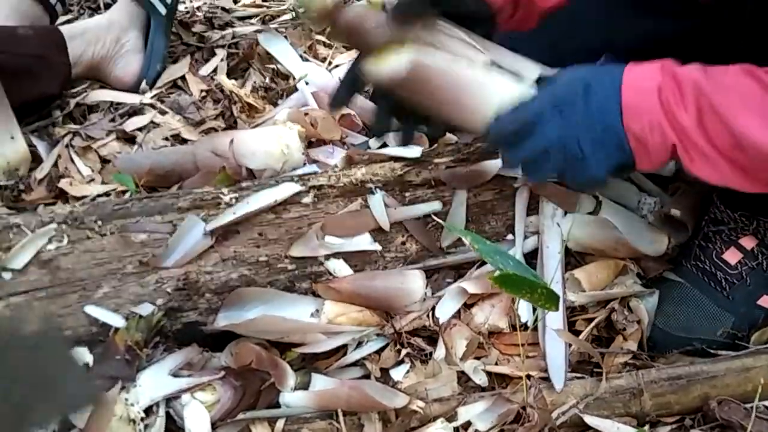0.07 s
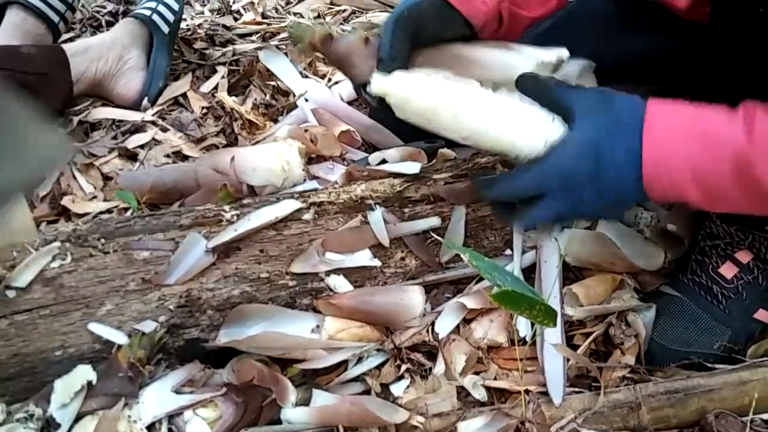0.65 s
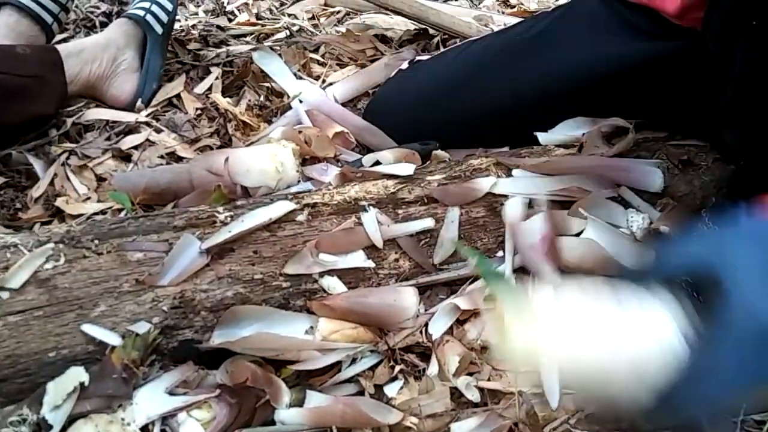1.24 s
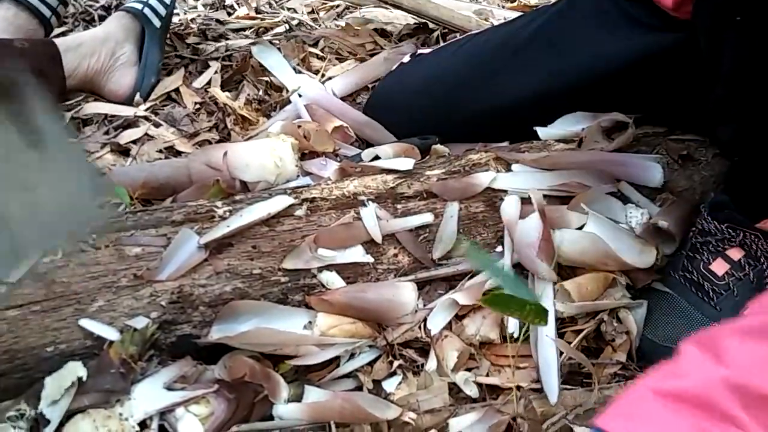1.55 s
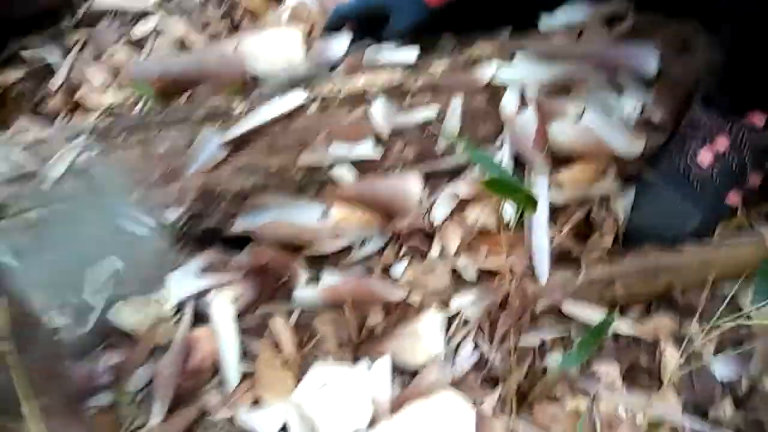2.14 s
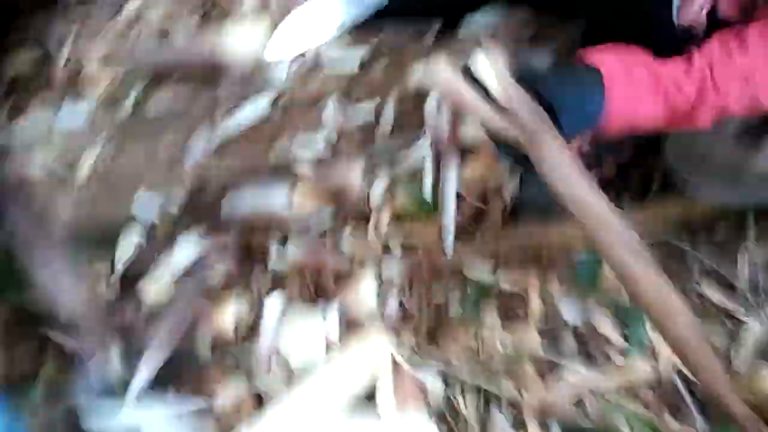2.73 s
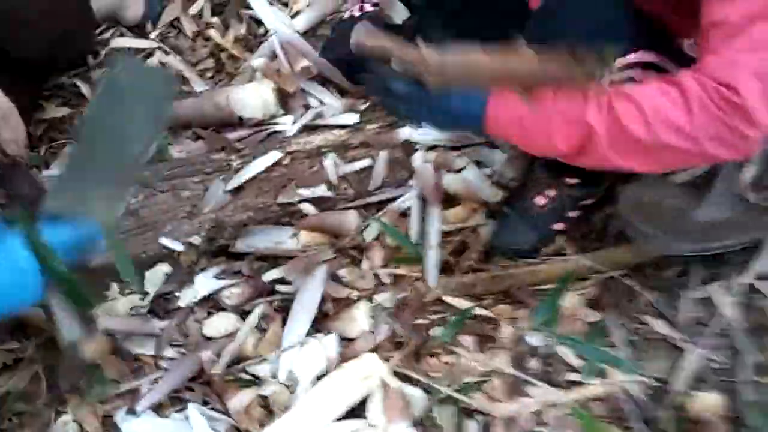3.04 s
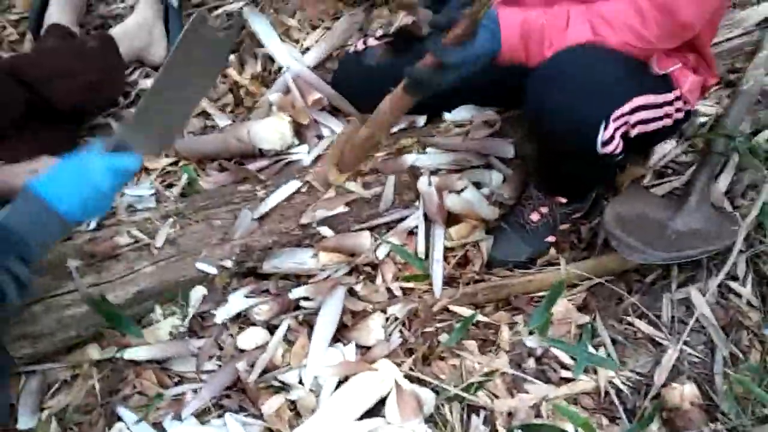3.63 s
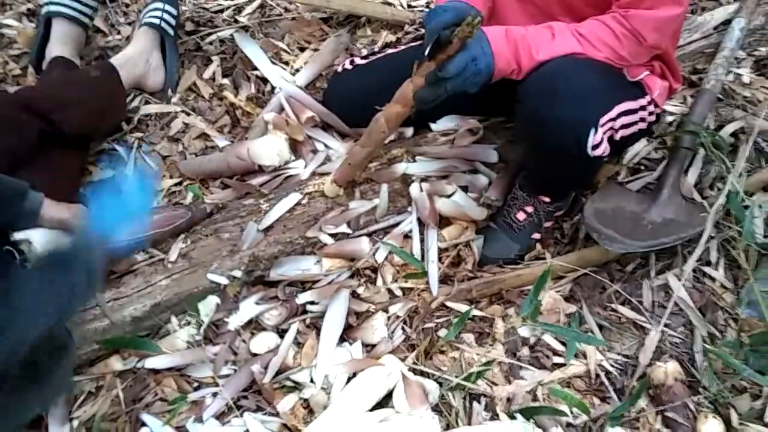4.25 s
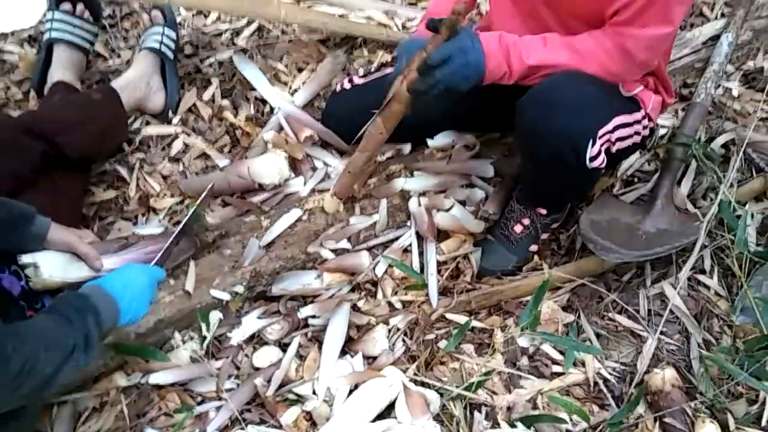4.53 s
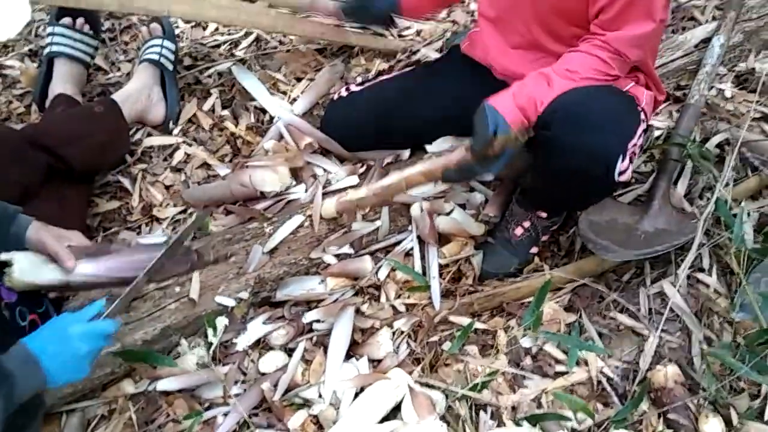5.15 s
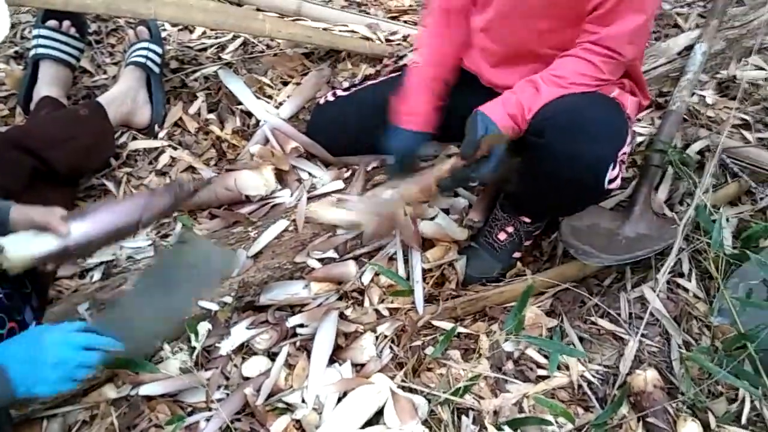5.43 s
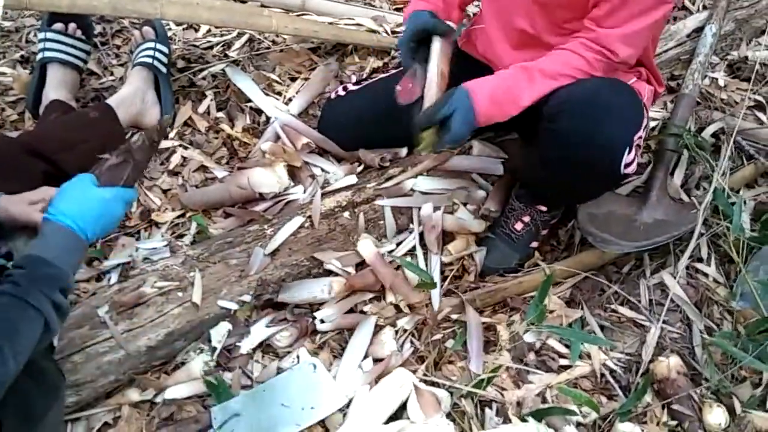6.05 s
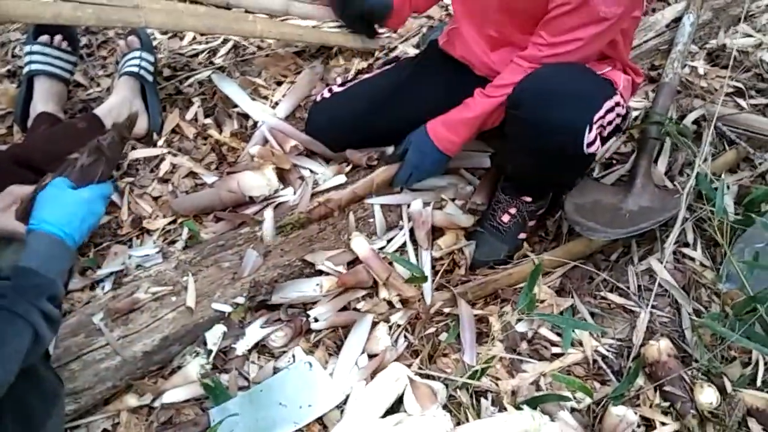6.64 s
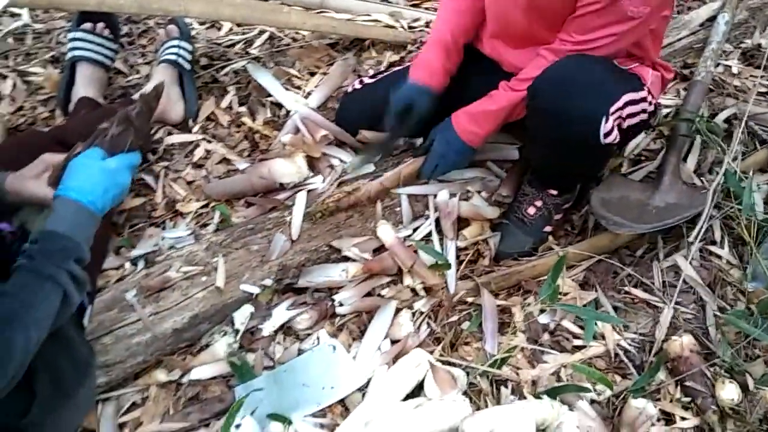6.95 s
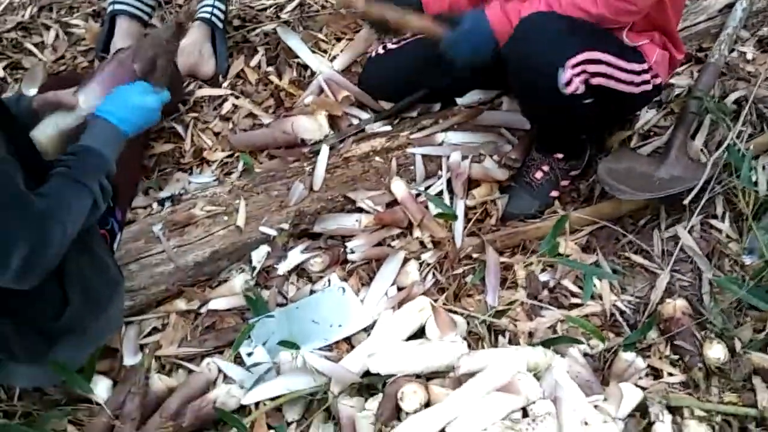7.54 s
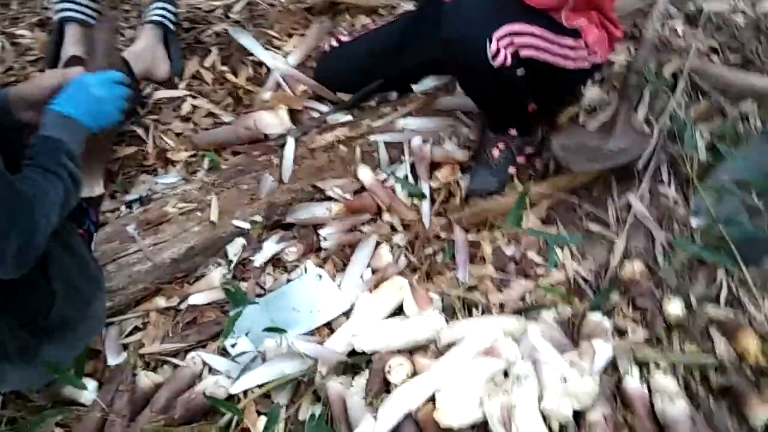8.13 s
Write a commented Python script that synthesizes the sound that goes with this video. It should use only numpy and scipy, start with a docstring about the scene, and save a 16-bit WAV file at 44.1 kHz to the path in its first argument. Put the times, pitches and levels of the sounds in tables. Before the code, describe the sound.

Crisp blade chops, crackling husks being stripped and dry leaf rustle outdoors, with soft thuds and a faint low rumble.

```python
"""Cleavers crunch through juicy bamboo shoots as two people trim them on a forest floor of dry leaves.
Each stroke breaks a bundle of fibres and knocks on a log; a graze sets the steel ringing.
Stiff husks are torn off with runs of snaps; landing strokes and dropping pieces make soft thuds.
Leaves and husks rustle all the time over a low outdoor rumble and a faint hiss.
Midway the microphone draws back and the rustle turns duller."""
import sys
import numpy as np
from scipy import signal
from scipy.fft import rfft, irfft, next_fast_len
from scipy.io import wavfile

SR = 44100
rng = np.random.default_rng(int(sys.argv[2]) if len(sys.argv) > 2 else 0)


def wav_out(sig):
    """Save sig, one row per channel (or a flat mono array), as 16-bit PCM at SR to the path in sys.argv[1]."""
    wavfile.write(sys.argv[1], SR, np.round(np.clip(np.atleast_2d(sig).T, -1, 1) * 32767).astype(np.int16))


N = 369999
TIME = np.arange(N) / SR


def from_db(db):
    """Turn decibels into a number to multiply a sound by."""
    return 10 ** (np.asarray(db) / 20)


def rms_one(x):
    """Scale a signal so its average strength (rms) is 1."""
    return x / np.sqrt(np.mean(x ** 2) + 1e-20)


def in_time(rows):
    """Join timed rows with straight lines, giving each column a value at every sample."""
    s, *columns = np.transpose(rows)
    return [np.interp(TIME, s, column) for column in columns]


def at_hz(points, hz):
    """Read a tone curve, in dB, between its listed pitches."""
    known_hz, db = np.transpose(points)
    return np.interp(np.log(hz), np.log(known_hz), db)


def bump(hz, centre_hz, width_hz):
    """A peak of height 1 around the pitch where something rings."""
    return 1 / (1 + (2 * (hz - centre_hz) / width_hz) ** 2)


def bins(size):
    """The frequencies in the spectrum of `size` samples, kept above zero."""
    return np.maximum(np.arange(size // 2 + 1) * SR / size, 1)


def colour(x, gain_db):
    """Turn each frequency up or down; ringing comes after a hit, never before (minimum phase)."""
    cepstrum = irfft(np.log(from_db(gain_db)), len(x))
    cepstrum[1:len(x) // 2] *= 2
    cepstrum[len(x) // 2 + 1:] = 0
    return irfft(rfft(x) * np.exp(rfft(cepstrum)), len(x))


def shaped(x, tone, low_hz=0, high_hz=SR):
    """Keep one band of a long signal and give it a tone curve; strength 1."""
    size = next_fast_len(N)
    hz = bins(size)
    band = 1 / np.sqrt((1 + (low_hz / hz) ** 12) * (1 + (hz / high_hz) ** 12))
    spectrum = rfft(x, size) * band * from_db(at_hz(tone, hz))
    return rms_one(irfft(spectrum, size)[:N])


def wander(size, steps):
    """A line that drifts between random values, mostly within -1 to 1."""
    count = int(steps) + 2
    return np.interp(np.linspace(0, steps, size), np.arange(count), rng.standard_normal(size)[:count])


def add(out, s, sound):
    """Mix a sound in at s seconds."""
    start = max(round(s * SR), 0)
    out[start:start + len(sound)] += sound[:N - start]


def breaking(per_s, spread_db, fade_s, smooth):
    """Loudness of fibres breaking at random over smooth sliding. Every fade_s is the time to drop 60 dB."""
    sizes = from_db(spread_db * np.minimum(rng.exponential(1, N), 3.5))   # many small, few large
    breaks = sizes ** 2 * (rng.random(N) < per_s / SR)
    power = signal.lfilter([1], [1, -from_db(-120 / (fade_s * SR))], breaks + 1e-18)
    return rms_one(np.sqrt(power / power.mean() + smooth))


def fracture(length_s, swell_db, gain_db, grain_db, fade_s, scatter_db, scatter_fade_s):
    """A burst of noise: a crack runs through fibres, rings and scatters off the ground."""
    size = 2 * (len(gain_db) - 1)
    t = np.arange(size) / SR
    after_s = np.maximum(t - length_s, 0)
    force = from_db(swell_db * np.minimum(t / length_s, 1)) * np.minimum(t / 0.00037, 1)
    fibres = from_db(grain_db * wander(size, 1500 * size / SR) - 60 * after_s / fade_s)
    scatter = from_db(scatter_db - 60 * after_s / scatter_fade_s)
    sound = colour(rng.standard_normal(size) * force * np.hypot(fibres, scatter), gain_db)
    return sound * np.sqrt(length_s * SR / np.sum(sound ** 2))


def distance(s):
    """How far the microphone has drawn back, 0 to 1."""
    return np.clip((s - 3.2) / 2.4, 0, 1)


# Tone curves of the outdoor rumble and the far-off forest hiss: pitch_hz, gain_db
RUMBLE_TONE = [(20, -22), (45, -28), (75, -3), (115, 2.5), (160, -5), (240, -24), (500, -41), (1200, -22.5),
               (3000, -67)]
HISS_TONE = [(300, -7.5), (600, -9.5), (1000, -5), (1130, 2), (1250, 10.5), (1550, -4), (1850, -29),
             (2300, -34), (2600, -15), (3100, -23.5), (4200, 4), (5300, 3), (6300, -32), (16000, -14.5)]
# How the rumble rises and falls, before a 2.5 dB lift: time_s, level_db
RUMBLE_LEVEL = [(0, -60.5), (1.1, -60.5), (2, -64.5), (4, -63), (4.7, -69), (5.8, -63), (6.1, -80.5),
                (6.8, -68.5), (7.3, -76), (8.39, -71)]
def open_air():
    """Low rumble and a faint, even hiss from the forest."""
    level_db, = in_time(RUMBLE_LEVEL)
    rumble = from_db(level_db + 2.5) * shaped(rng.standard_normal(N), RUMBLE_TONE)
    hiss = from_db(-61) * shaped(rng.standard_normal(N), HISS_TONE)
    return rumble + hiss


# In all tables, body_db turns the lower tones up or down, and air_db the very highest.
# Constant stirring of the leaves: time_s, level_db, body_db
STIR = [(0, -48.5, -5.5), (.15, -56, -0.5), (.65, -56, -6), (1.25, -54, -26), (1.5, -50.5, -10),
        (1.7, -49.5, -4), (2.1, -42.5, -9.5), (3.0, -42.5, -12), (3.5, -50.5, -33), (3.95, -49.5, -11),
        (4.15, -61.5, -14), (4.85, -44, -8), (5.18, -68, -1.5), (5.42, -67, -3), (5.55, -46.5, -6.5),
        (6.5, -46, -16), (7.2, -46.5, -6), (8.39, -44.5, -10.5)]
# A hand, sleeve or shoot sweeps through the leaves: loudest_s, length_s, level_db, air_db
SWEEPS = [(0.245, 0.18, -44.5, -2), (1.599, 0.15, -45.5, 3), (2.413, 0.2, -32.5, -7),
          (2.599, 0.12, -23.5, -13), (2.803, 0.53, -33, -12.5), (3.194, 0.27, -39.5, 1.5),
          (3.388, 0.088, -38.5, -1), (3.611, 0.087, -39, -7), (5.27, 0.062, -47, -10),
          (5.34, 0.075, -53, -0.5), (5.588, 0.031, -34.5, -17), (5.695, 0.16, -35.5, -2.5),
          (5.873, 0.13, -35.5, -7), (6.362, 0.19, -38, -3.5), (6.792, .2, -35, -6.5),
          (6.995, 0.064, -43, -17), (7.284, 0.043, -39, -14), (7.619, 0.26, -33, -2.5),
          (8.004, 0.3, -33.5, -4.5), (8.127, 0.74, -44.5, 2)]
def leaf_movement():
    """Stirring, sweeps and settling leaves add up to three curves: level_db, body_db, air_db."""
    t = TIME[::100]
    times, levels, bodies = np.transpose(STIR)
    moves = [(np.interp(t, times, levels), np.interp(t, times, bodies), -5.5)]   # level, body, air
    for s, length_s, level_db, air_db in SWEEPS:
        from_peak = 2 * (t - s) / length_s * np.where(t > s, 1.29, 1)   # dies faster than it builds
        moves.append((level_db - 10.5 * from_peak ** 2, -14, air_db))
    # Each cut and each tear's end jolts the leaves, which then settle.
    jolts = [(s + bite_s, level_db - 24, 136) for s, bite_s, level_db, *_ in CUTS]
    jolts += [(s, pull_db - 12.5, 77.5) for *_, (s, pull_db) in PULLS]
    rise_db_per_s = 893.5
    for s, level_db, fall_db_per_s in jolts:
        below_peak_db = np.maximum(rise_db_per_s * (s - t), fall_db_per_s * (t - s))
        moves.append((level_db - below_peak_db, -6, -5))
    power = sum(from_db([db, db + body_db, db + air_db]) ** 2 for db, body_db, air_db in moves)
    level, body, air = (np.interp(TIME, t, 10 * np.log10(p)) for p in power)
    return level, body - level, air - level


# Tone curves of the leaves from close by and from farther off: pitch_hz, gain_db
LEAVES_NEAR = [(200, -15.5), (450, -14), (950, -3.5), (1250, -3.5), (2200, -9), (3200, -4.5), (4300, -4.5),
               (7200, -4.5), (8600, -12.5), (10500, -19.5), (14000, -9), (16000, -8.5)]
LEAVES_FAR = [(200, -27), (450, -16.5), (900, -0.5), (1300, -7.5), (2200, -6), (3200, 3), (4100, 4),
              (5500, -4.5), (7500, -9.5), (10500, -12.5), (14000, -7), (16000, -5.5)]
def rustle(level_db, body_db, air_db):
    """Dry leaves slide and crackle; some crackles fill all five pitch bands, others only one."""
    far = distance(TIME)
    shared = breaking(per_s=200, spread_db=3.7, fade_s=.015, smooth=1.3)
    # Thick husks sound below the leaves, in lumps, and fade when handled gently.
    lumps_db = 3 * wander(N, 22 * N / SR)
    husk_db = body_db - 4 + lumps_db + np.minimum(level_db + body_db + 42, 0)
    bands = [(220, 780, husk_db), (1190, 2320, body_db - .8), (1950, 5540, -3),
             (4370, 7900, -4.5 - 4 * far), (7660, 13800, air_db)]
    out = np.zeros(N)
    for low_hz, high_hz, band_db in bands:
        own = breaking(per_s=200, spread_db=4.5, fade_s=.006, smooth=.7)
        shifting_db = 1.5 * wander(N, 16 * N / SR)
        crackle = rng.standard_normal(N) * np.hypot(shared, own) * from_db(shifting_db)
        near_leaves = shaped(crackle, LEAVES_NEAR, low_hz, high_hz)
        far_leaves = shaped(crackle, LEAVES_FAR, low_hz, high_hz)
        out += from_db(level_db + band_db) * ((1 - far) * near_leaves + far * far_leaves)
    return out


def leaf_ticks(stir_db, body_db, air_db, count=110):
    """Single dry leaves tick at random; they stand out most when the rest lie nearly still."""
    out = np.zeros(N)
    for when, size, pitch, crispness in rng.random((count, 4)):
        i = int(when * N)
        level_db = .75 * stir_db[i] - 9 + 8 * size ** 2
        tick = crack(.001, body_db[i] - 4.5, air_db[i] + 14 * crispness + 8, ring_hz=2200 * 4 ** pitch)
        add(out, TIME[i], from_db(level_db) * tick)
    return out


# Tone curve of a cracking husk: pitch_hz, gain_db
HUSK_TONE = [(60, -33), (300, -33), (600, -10), (1000, 4), (2000, 1.5), (4000, 7), (7000, 2), (9500, -4),
             (14000, 0.5), (16000, -8)]
def crack(length_s, body_db, air_db, ring_hz):
    """A dry piece cracks and rings briefly, each with a slightly different tone."""
    hz = bins(size=4096)
    tint_db = at_hz([(1500, body_db), (2600, 0.0029), (7000, 0.0036), (9500, air_db)], hz)
    ring_db = 8 * bump(hz, ring_hz, .3 * ring_hz)
    gain_db = at_hz(HUSK_TONE, hz) + tint_db + ring_db + 2.5 * wander(len(hz), 70)
    return fracture(length_s, -3, gain_db, grain_db=3, fade_s=.012, scatter_db=-17, scatter_fade_s=.05)


def snap(length_s, body_db, air_db):
    """One piece breaks: a bigger piece has more body and rings lower."""
    ring_hz = np.clip(2530 * 2 ** (-body_db / 11), 1610, 6600)   # an octave down per 11 dB of body
    return crack(length_s, body_db, air_db, ring_hz)


# The loudest snaps of husks and twigs: start_s, length_s, level_db, body_db, air_db
SNAPS = [(0.091, 0.013, -39, -11, 3.5), (.226, 0.012, -25.5, 8, -11), (0.3456, 0.0054, -26, 2, -16),
         (0.368, 0.0084, -25, 4.5, -10), (0.399, 0.0038, -36, -3, -3), (0.435, 0.0067, -38, 5, -7),
         (0.473, 0.0047, -32, -10, -7), (0.668, 0.018, -37.5, 4.5, -6), (0.7476, 0.0024, -36, -30, 0),
         (.769, .0045, -40, -34, -1), (0.8044, 0.004, -35.5, 4.5, 3), (0.841, .008, -33, 14, 1),
         (0.894, .005, -30, -9, -9), (0.938, 0.0086, -26, -15, -2), (1.089, 0.003, -35, -30, -4),
         (1.1847, 0.0064, -40, -28, -3), (1.3422, 0.0052, -22.5, -19.5, -3),
         (1.635, 0.0089, -27.5, -1, 0.5), (1.753, 0.031, -31, -9.5, 2), (1.938, 0.0022, -25.5, 8, -20),
         (2.017, .014, -37.5, 5, 5), (2.4, 0.0052, -28, -1.5, -12), (2.419, 0.00054, -14, -8, 22),
         (2.558, 0.0068, -31, 5, -8), (2.584, 0.0077, -15, -16, -11), (2.725, .002, -26.5, -14, -16),
         (2.955, 0.0057, -30.5, -6.5, -1), (3.61, 0.01, -34, -5.5, -10), (3.8144, 0.012, -33.5, -4.5, 3),
         (3.926, 0.0077, -38.5, -22, 4), (3.975, .002, -37, -22, 4), (4.243, 0.0017, -39, -12, 11),
         (4.297, 0.0078, -37, -15, 14), (4.486, 0.0088, -21.5, -7, 5), (4.687, .001, -13, -10, 1),
         (4.709, 0.0034, -22, -4.5, 0), (4.89, 0.0021, -27, 1.5, -26), (4.924, 0.0021, -34, 7, -6),
         (5.254, 0.013, -49.5, 7.5, 1), (5.4754, 0.01, -18, -4.5, -0.5), (5.63, 0.0099, -31, -4, -14),
         (5.64, 0.028, -22.5, -5.5, 0), (5.869, 0.0028, -26, -0.5, -19), (6.025, .0015, -32, -3, -24),
         (6.19, .0015, -31, -8, -6), (6.263, 0.0072, -24, -3, -0.5), (6.799, 0.0021, -27.5, -4, -20),
         (6.889, 0.0018, -25.5, 7, -13), (6.978, 0.0012, -24, -5.5, -25), (7.1015, .01, -26, 1.5, -1.5),
         (7.2535, 0.023, -31.5, 0, -7), (7.563, 0.0021, -14.5, 24, -14), (7.66, 0.0024, -22.5, 6, -14),
         (7.718, 0.0021, -23, 4.5, -8), (7.74, 0.0027, -22, 5, -16), (7.762, 0.0038, -26, 2, -1),
         (7.7782, 0.0054, -17.5, 6, -29), (7.885, 0.0062, -29, 3, -9), (7.9705, 0.0029, -23.5, 1, -11),
         (8.136, 0.0014, -23.5, -8, 4), (8.193, 0.0054, -27.5, -9.5, 6)]
def snaps():
    """Husk fibres and twigs give way one by one."""
    out = np.zeros(N)
    for s, length_s, level_db, body_db, air_db in SNAPS:
        add(out, s, from_db(level_db) * snap(length_s, body_db, air_db))
    return out


def tear(pull, tone, per_s, spread_db, smooth):
    """A husk splits along its fibres for as long as it is pulled."""
    pull_db, = in_time(pull)
    start_s, end_s = pull[0][0], pull[-1][0]
    outside_s = np.maximum(np.maximum(start_s - TIME, TIME - end_s), 0)
    fibres = rng.standard_normal(N) * breaking(per_s, spread_db, fade_s=.008, smooth=smooth)
    return from_db(pull_db - 3000 * outside_s) * shaped(fibres, tone)


# How hard the husk is pulled during each of four tears: time_s, pull_db
PRY_PULL = [(0.24, -37), (0.3, -42), (0.38, -34.5), (0.44, -32.5), (0.46, -41.5), (0.53, -42.5)]
PEEL_PULL = [(0.82, -32), (0.84, -39), (0.87, -25.5), (0.93, -24.5), (0.978, -32)]
SLIT_PULL = [(4.471, -25.5), (4.51, -26), (4.551, -22.5), (4.6, -26.5), (4.64, -22.5), (4.661, -20.5),
             (4.7, -28.5)]
STRIP_PULL = [(7.571, -24), (7.63, -36.5), (7.68, -39), (7.719, -28.5), (7.799, -28)]
PULLS = (PRY_PULL, PEEL_PULL, SLIT_PULL, STRIP_PULL)
# Tone curve of each tear: pitch_hz, gain_db
PRY_TONE = [(150, -24), (250, -18.5), (380, -25), (460, -11.5), (547, -9), (674, -18), (1020, 2.5),
            (1470, -10), (1790, -2.5), (2810, -14.5), (3460, 0), (4990, -11.5), (6700, 1.5), (9170, -20.5),
            (16000, -16)]
PEEL_TONE = [(150, -53), (250, -24), (414, -24), (510, -12), (802, -18), (955, -10.5), (1400, -14.5),
             (2130, -7.5), (2530, -18), (3910, -4.5), (4260, -10), (6360, -0.5), (9170, -21),
             (14900, -14.5), (16000, -10)]
SLIT_TONE = [(150, -80), (250, -43), (452, -34), (501, -19), (761, -17), (906, -10), (1550, -9), (1850, -4),
             (2240, -6.5), (2710, -1.5), (3340, -4), (4900, 1), (9660, -11), (14200, -10), (16000, -14)]
STRIP_TONE = [(120, -73), (200, -55), (465, -10), (749, -9), (867, -2), (933, -9), (1140, -1), (1590, -3),
              (2050, -1.5), (4520, -1.5), (5940, -14), (7680, -12), (11900, -14), (14900, -11),
              (16000, -20)]
def tears():
    """Prying a stiff husk crackles coarsely; peeling, slitting and stripping are finer and denser."""
    pry = tear(PRY_PULL, PRY_TONE, per_s=200, spread_db=2.8, smooth=.12)
    peel = tear(PEEL_PULL, PEEL_TONE, per_s=600, spread_db=3.0, smooth=.4)
    slit = tear(SLIT_PULL, SLIT_TONE, per_s=600, spread_db=3.3, smooth=.45)
    strip = tear(STRIP_PULL, STRIP_TONE, per_s=350, spread_db=3.2, smooth=.35)
    return from_db(7.0) * pry + from_db(-0.4) * peel + from_db(1.76) * slit + from_db(-1.5) * strip


def tear_snaps(per_tear=4):
    """Thicker fibres break at uneven moments along a tear, louder the harder it is pulled."""
    out = np.zeros(N)
    for pull in PULLS:
        times, pull_db = np.transpose(pull)
        for k, (when, force, size) in enumerate(rng.random((per_tear, 3))):
            s = times[0] + (times[-1] - times[0]) * (k + when) / per_tear
            level_db = np.interp(s, times, pull_db) - 3 + 5 * (force - .5)
            fibre = snap(length_s=.003, body_db=-7 + 20 * (size - .5), air_db=-5)
            add(out, s, from_db(level_db) * fibre)
    return out


# Tone curve of a cut shoot, and what distance adds to it: pitch_hz, gain_db
SHOOT_TONE = [(25, -33), (60, -31.5), (150, -8), (400, -3), (700, -9.5), (1800, -3), (2700, -2.5),
              (4300, 2), (7500, 3), (8700, -4), (10500, -10), (14000, -6), (16000, -8)]
FAR_TINT = [(2000, 5), (3100, 7.5), (4300, 1.5), (7500, -5.5), (10000, 1.5)]
def crunch(s, length_s, thud_db, body_db, air_db, hollow_hz, shell_hz, swell_db):
    """The blade crunches through a shoot; its chambers and shell ring, and the log adds a quick echo."""
    hz = bins(size=8192)
    tint = [(300, thud_db), (600, body_db), (1600, body_db), (2800, 0), (7500, 0.012), (9500, air_db)]
    tint_db = at_hz(tint, hz) + distance(s) * at_hz(FAR_TINT, hz)
    ring_db = 5 * bump(hz, hollow_hz, 300) + 9 * bump(hz, shell_hz, 530)
    echo_s = rng.uniform(.002, .005)
    echo_db = 2.5 * np.cos(2 * np.pi * hz * echo_s)   # so quick an echo ripples the tone curve
    gain_db = at_hz(SHOOT_TONE, hz) + tint_db + ring_db + echo_db
    return fracture(length_s, swell_db, gain_db,
                    grain_db=-1.5, fade_s=.0061, scatter_db=-17.5, scatter_fade_s=.12)


# Cleaver strokes (drag_db is added to level_db):
# start_s, bite_s, level_db, drag_s, drag_db, thud_db, body_db, air_db, hollow_hz, shell_hz, knock_db
CUTS = [(1.347, 0.017, -12.5, 0.025, -4, -15.5, -3, -2.5, 1700, 4900, -55),
        (1.79, .029, -13, 0.018, -11, -8.5, 3.5, -2.5, 1480, 4330, -60),
        (2.1788, 0.023, -10.5, 0.023, -6, -15, 5, 5, 1620, 4180, -60),
        (2.589, 0.011, -10, 0.021, -4.5, -13, -1.5, -3.5, 2330, 6230, -52),
        (2.607, 0.0061, -6.5, 0.013, -24, 2.5, 6.5, -11, 1200, 6770, -31),
        (4.32, .011, -6, 0.0065, -8.5, -11.5, 2.5, 2, 2570, 5220, -35.5),
        (5.4363, 0.011, -9, 0.029, -13, -16, -0.5, 3.5, 1540, 4700, -47),
        (5.657, 0.0046, -5, 0.04, -18.5, -3, -4.5, 0, 2500, 3300, -45),
        (6.8673, .0025, -9, 0.0096, -4, -14, -1, 1.5, 3620, 6170, -50)]
# Low notes of the log under the shoot: pitch_hz, gain_db, fade_s
LOG_NOTES = [(138, 5, 0.1), (305, 3, 0.048)]
def cuts():
    """Each stroke bites hard, drags on more weakly through the shoot and knocks on the log beneath."""
    out = np.zeros(N)
    for s, bite_s, level_db, drag_s, drag_db, *tone, knock_db in CUTS:
        add(out, s, from_db(level_db) * crunch(s, bite_s, *tone, swell_db=-1))
        add(out, s + bite_s, from_db(level_db + drag_db) * crunch(s, drag_s, *tone, swell_db=-5.5))
        for pitch_hz, gain_db, fade_s in LOG_NOTES:
            add(out, s + bite_s / 2, from_db(knock_db + gain_db) * thud(pitch_hz, fade_s))
    return out


# Ringing notes of the cleaver's steel: pitch_hz, gain_db, fade_s
STEEL_NOTES = [(4270, 0, .3), (4420, -6, .13), (6870, -11, .16), (7577, -9, .16), (8490, -8, .20)]
# The edge grazes the shoot: start_s, level_db
GRAZES = [(1.350, -42), (1.560, -52), (1.795, -40), (1.965, -47), (2.090, -43), (2.155, -41), (2.190, -39),
          (2.395, -40)]
def blade_ring():
    """Each graze sets all the notes of the steel ringing, each with a slightly random strength."""
    out = np.zeros(N)
    t = np.arange(SR // 2) / SR
    fade_in = np.minimum(t / .006, 1)
    for s, level_db in GRAZES:
        for pitch_hz, gain_db, fade_s in STEEL_NOTES:
            strength_db = level_db + gain_db + rng.normal(1, 2)
            note = np.sin(2 * np.pi * pitch_hz * t)
            add(out, s, from_db(strength_db - 60 * t / fade_s) * note * fade_in)
    return out


def thud(pitch_hz, fade_s):
    """A soft bump: a dying burst of noise around one low pitch."""
    hz = bins(size=8192)
    off_pitch = hz / pitch_hz - pitch_hz / hz
    gain_db = np.maximum(-20 * np.log10(1 + off_pitch ** 2), -70)
    return fracture(.0055, 3, gain_db, grain_db=7.5, fade_s=fade_s, scatter_db=-25.5, scatter_fade_s=.1)


# Soft, low thuds: start_s, level_db, pitch_hz, fade_s
THUDS = [(1.939, -34, 500, 0.029), (2.362, -43.5, 254, 0.28), (2.819, -42, 240, 0.059),
         (2.885, -39, 201, 0.033), (3.112, -53, 600, 0.1), (4.71, -36.5, 256, 0.093),
         (5.656, -40, 60, .037), (5.67, -40, 325, .06), (5.745, -46, 298, 0.45), (6.216, -55, 440, 0.36),
         (6.869, -35, 295, 0.63), (7.216, -46, 328, 0.3), (7.26, -48, 407, 0.14)]
def thuds():
    """Cleaver strokes land and pieces drop with soft, low thuds."""
    out = np.zeros(N)
    for s, level_db, pitch_hz, fade_s in THUDS:
        add(out, s, from_db(level_db) * thud(pitch_hz, fade_s))
    return out


def scene():
    """The trimming, the leaves and the open air, mixed into one channel."""
    movement = leaf_movement()
    trimming = cuts() + blade_ring() + snaps() + thuds() + tears() + tear_snaps()
    return (trimming + rustle(*movement) + leaf_ticks(*movement) + open_air())[None]


def record(dry):
    """Round off the loudest peaks and cut the treble above 16000 Hz."""
    rounded = dry / (1 + (dry / 1.05) ** 4) ** .25
    low_pass = signal.ellip(12, .2, 75, 16000, fs=SR, output="sos")
    return signal.sosfilt(low_pass, rounded)


dry = scene()
out = record(dry)
wav_out(out)
```